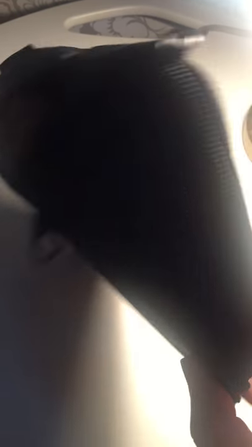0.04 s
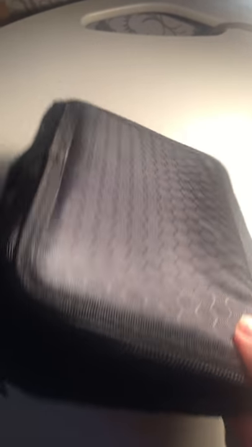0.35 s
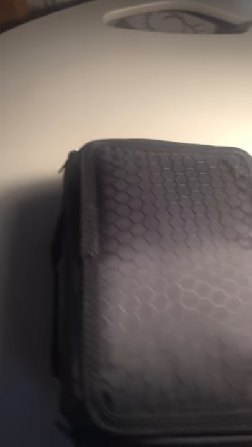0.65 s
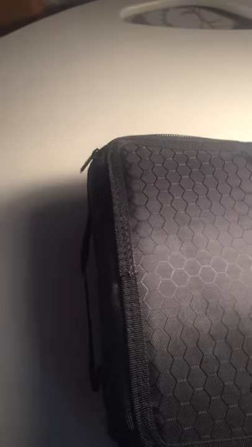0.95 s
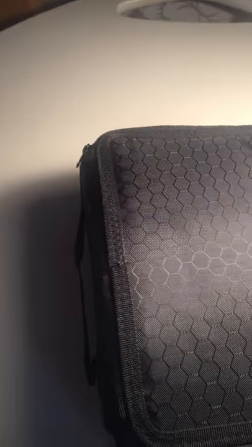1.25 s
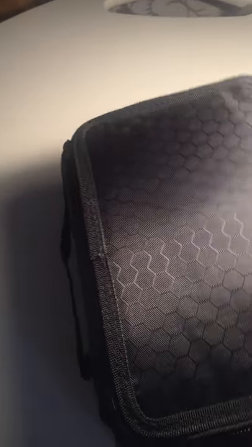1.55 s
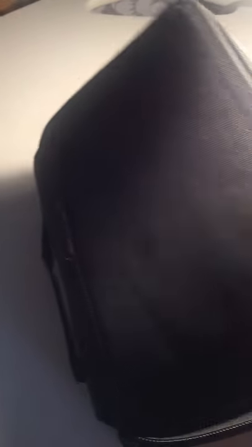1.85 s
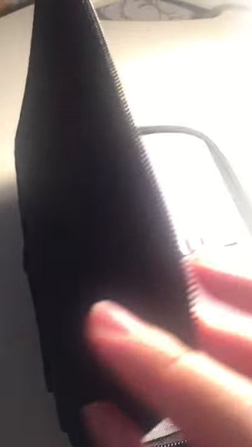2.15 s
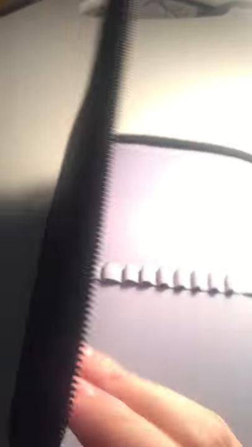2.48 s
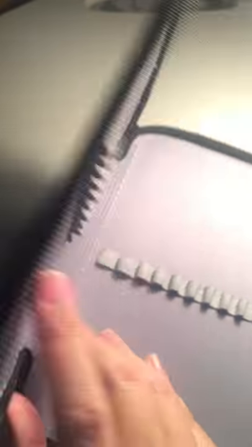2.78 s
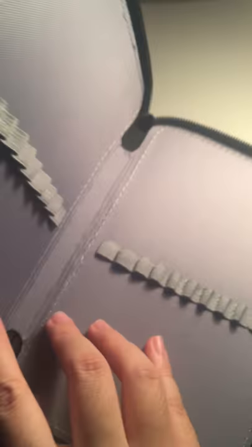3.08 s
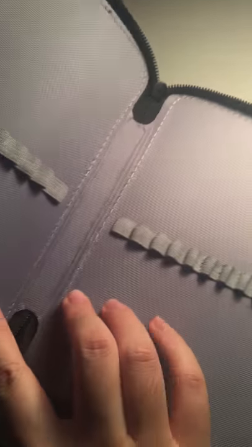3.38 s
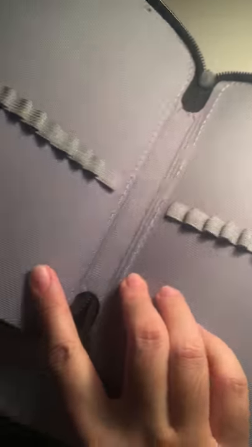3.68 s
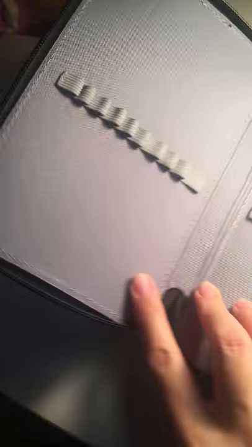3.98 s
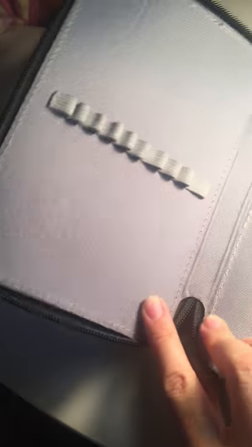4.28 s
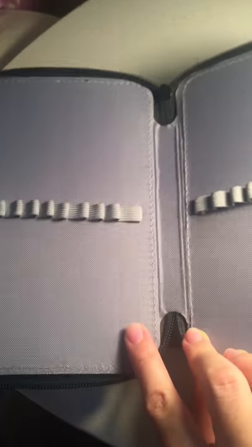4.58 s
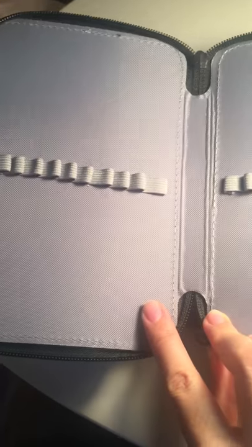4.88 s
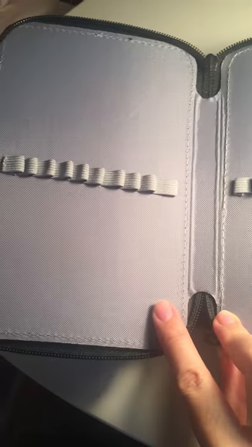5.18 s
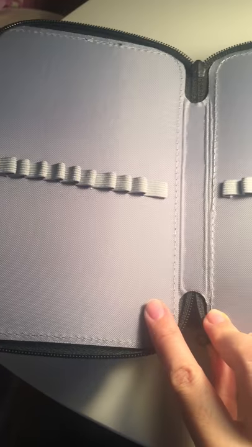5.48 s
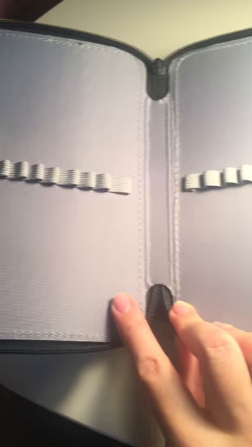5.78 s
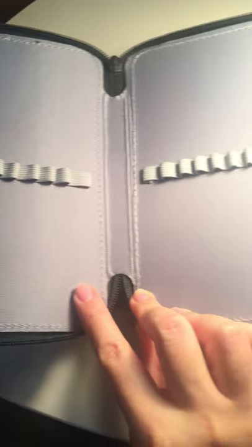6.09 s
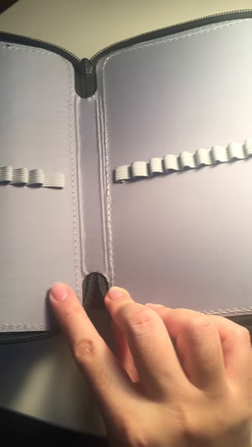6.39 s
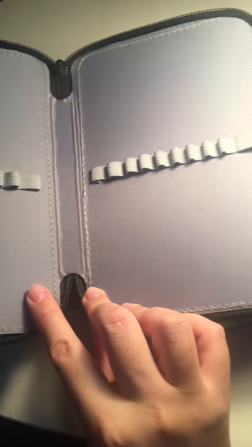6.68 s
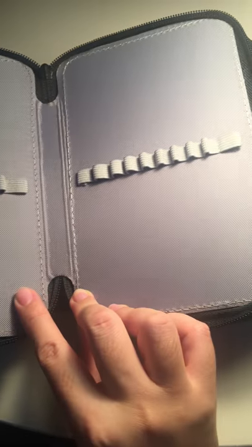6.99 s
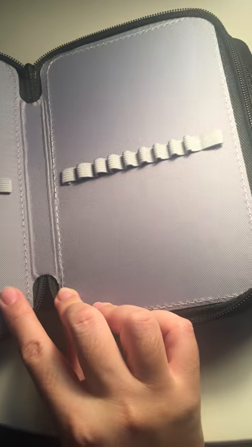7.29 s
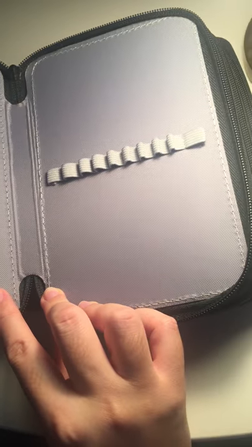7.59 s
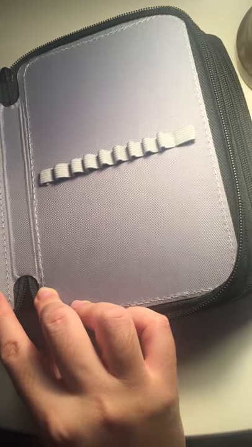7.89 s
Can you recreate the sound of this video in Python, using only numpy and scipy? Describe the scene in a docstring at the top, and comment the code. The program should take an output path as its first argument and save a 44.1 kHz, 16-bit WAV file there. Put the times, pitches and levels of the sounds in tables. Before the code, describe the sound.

A stiff fabric pencil case is set down and opened, with rustling scrapes, soft knocks and small zipper clicks in a quiet room.

```python
"""A stiff fabric pencil case is set down on a desk, opened and slid about by hand in a quiet room.
Its ribbed edge rasps over the desk, the padded shell drags and the cloth swishes: trains of tiny slips.
Corners knock, fingers tap and the spine creaks through a shell whose resonances change as it opens.
Zipper teeth chatter and the metal pulls jingle. Then the hand rests, leaving the room's low hum."""
import sys
import numpy as np
from scipy import signal
from scipy.fft import rfft, irfft, next_fast_len
from scipy.io import wavfile
from scipy.ndimage import map_coordinates

SR = 44100
rng = np.random.default_rng(int(sys.argv[2]) if len(sys.argv) > 2 else 0)


def wav_out(sig):
    """Save sig, one row per channel (or a flat mono array), as 16-bit PCM at SR to the path in sys.argv[1]."""
    wavfile.write(sys.argv[1], SR, np.round(np.clip(np.atleast_2d(sig).T, -1, 1) * 32767).astype(np.int16))


N = 355005
TIME = np.arange(N) / SR
FREQS = np.fft.rfftfreq(4096, 1 / SR)

# Shell resonances, folded and flat. Each row: centre in Hz, width in Hz, gain in dB (dead spot if < 0).
FOLDED_MODES = [(369, 19, 7.5), (476, 64, 8.5), (548, 27, -4.5), (603, 57, 7), (717, 105, 6.5),
                (800, 85, 0), (853, 20, 0), (1080, 45, 7), (1286, 66, 1), (1374, 58, 3), (1620, 220, -1),
                (1853, 75, 9.5), (2010, 78, 2), (2210, 87, -4), (2240, 250, 9), (2580, 390, 5),
                (2940, 90, 6.5), (3525, 41, 9), (4130, 130, 0), (5570, 130, 11.5)]
FLAT_MODES = [(403, 120, -4.5), (500, 30, 6.5), (601, 47, 8), (692, 63, 7), (753, 150, 7), (980, 71, -3.5),
              (1150, 160, 4.5), (1400, 100, -7), (1615, 96, 9.5), (1838, 59, 8), (1984, 50, 10.5),
              (2177, 110, -9), (2240, 160, 9), (2490, 110, -0.5), (2650, 110, 4.5), (2880, 100, 9),
              (2980, 180, 7), (4090, 150, 0.5), (4600, 1200, -3.5)]
# Opening of the case. Each row: time in seconds, flatness from 0 to 1.
OPENING = [(3.2, 0), (3.8, 0.85)]


def rubbing(rest_s=4.95, rest_db_per_s=60):
    """Ribs tick over the desk, threads brush and the padded shell drags under uneven hand pressure."""
    # Friction spectra. Each row: frequency in Hz, relative level in dB.
    rasp_spectrum = [(60, -36), (250, -49), (420, 0.5), (650, -8.5), (1100, 5), (2000, 3.5), (2800, -0.5),
                     (4000, -2), (5800, -13.5), (7300, -24.5), (17000, -47)]
    swish_spectrum = [(100, -31), (600, -20), (1200, 9), (2000, -2), (3200, 5), (6000, -2), (8000, -1),
                      (9300, 3.5), (10500, -3.5), (13000, 4), (17000, -0.5)]
    drag_spectrum = [(30, -43.5), (110, -3.5), (260, -6.5), (450, -2.5), (720, -5), (950, -6), (1600, -10),
                     (5000, -51.5)]
    # Resonances of the stiff lid. Each row: centre in Hz, width in Hz, gain in dB.
    lid_modes = [(467, 130, 28), (706, 190, 30), (1026, 76, 6), (1400, 84, 15), (3060, 160, 4),
                 (3250, 150, 7.5), (4100, 210, 3.5), (4400, 35, 2), (5920, 720, 6.5), (6600, 500, 5)]
    pressure = wander(75)
    ribs = slips(per_s=420, jitter=0.4, uneven_db=3, hiss=0.32)
    threads = slips(per_s=2200, jitter=0.6, uneven_db=3, hiss=0.3)
    stutter = slips(per_s=260, jitter=0.6, uneven_db=2.5, hiss=0.58)
    rasp = through_case(ribs, rasp_spectrum) * amp(-4 + 1.12 * pressure)
    cloth_db = curve(swish_spectrum) + resonances(lid_modes)
    swish = unit(colour(threads, cloth_db)) * amp(1.5 + 0.94 * pressure)
    drag = through_case(stutter, drag_spectrum) * amp(-2 + 1.2 * pressure)
    grip = amp(-73) * rasp + amp(-78) * swish + amp(-75.5) * drag  # faint rustle under the hand
    grip *= amp(-rest_db_per_s * np.maximum(TIME - rest_s, 0))
    return grip + mix(edge_scrapes(rasp, drag)) + mix(cloth_swishes(swish))


def edge_scrapes(rasp, drag, pivot_hz=2000):
    """Edge and shell slide together; each scrape has its own brighter or duller rasp."""
    # Each row: start and length in seconds, gain and swell in dB, tilt in dB/octave, drag offset in dB.
    scrapes = [(0, 0.014, -59, -13, 9.5, 3), (0.12, 0.072, -65.5, 3, -1, 6.5),
               (0.267, .028, -53.5, -7, 2.5, 3.5), (0.369, 0.016, -53, -2, 0, 4),
               (0.422, 0.1, -57, -10, 1, 0.5), (0.543, 0.083, -58.5, 9, -2.5, -9),
               (0.627, .1, -65, 4, 2.5, 5.5), (0.865, 0.055, -39, -6, 4.5, -3),
               (0.935, 0.074, -52, -5.5, -0.5, -1.5), (1.004, .045, -67.5, -8, 0, -13),
               (1.502, 0.015, -48, 4, .5, -19), (1.618, 0.031, -53.5, 15, 0, -26),
               (1.747, 0.097, -55, -10.5, -1.5, -24), (1.897, 0.039, -54, -9, -2.5, -14),
               (2.256, 0.13, -68.5, 18, -4, -11), (2.372, 0.086, -45, 11, 2, -42),
               (2.454, 0.046, -43, 1.5, 5.5, -12), (2.529, 0.1, -45, -5, 1.5, -17),
               (2.648, 0.069, -40.5, 5, 2, -19.5), (2.734, .055, -47.5, -2.5, 1, -7),
               (2.843, 0.089, -52, -0.5, 3.5, -13), (2.97, 0.063, -50, -6, -3.5, -4),
               (3.07, .055, -59, -11, 8.5, 0.5), (3.384, 0.026, -43.5, 2.5, 2.5, -11),
               (3.44, 0.11, -68, -2, -3, 1), (3.877, 0.188, -47.5, 0.5, 3, -12.5),
               (4.088, 0.13, -43.5, 4.5, 0.5, -6.5), (4.242, 0.0083, -48, 9, 3, 2.5),
               (4.315, 0.028, -54.5, 5, -2, 6), (4.453, 0.045, -46.5, -2.5, -1, 0.5),
               (4.546, 0.034, -44, 5, 0, -18), (4.596, 0.083, -52.5, 3.5, -1.5, -30),
               (4.82, 0.018, -64, -7, -6.5, -12), (4.926, 0.032, -70.5, -8, -5, -12)]
    octaves = np.clip(np.log2((FREQS + 1) / pivot_hz), -2, 2)
    for start_s, length_s, db, swell_db, tilt_db, drag_db in scrapes:
        at_s, sound = stroke(rasp, start_s, length_s, db, swell_db)
        yield at_s, colour(sound, tilt_db * octaves)
        yield stroke(drag, start_s, length_s, db + drag_db, swell_db)


def cloth_swishes(swish):
    """Cloth brushes over cloth."""
    # Each row: start in seconds, length in seconds, gain in dB, swell in dB.
    swishes = [(0.118, 0.034, -64, -7), (0.261, 0.0039, -62, -1), (.37, 0.0079, -55, 7),
               (0.902, 0.093, -61, 12), (2.493, 0.13, -58.5, -4), (2.645, 0.15, -53.5, -6.5),
               (2.883, 0.026, -53, -4.5), (2.983, .035, -50.5, 2), (3.059, 0.07, -51.5, -2),
               (3.142, 0.068, -65.5, -8), (3.266, 0.028, -72, -2), (3.396, 0.089, -71, 4),
               (4.086, 0.094, -61, -3), (4.312, 0.028, -59.5, 11), (4.433, 0.063, -58.5, -6),
               (4.56, 0.13, -68, -7)]
    return [stroke(swish, *row) for row in swishes]


def stroke(friction, start_s, length_s, db, swell_db, attack_db_per_s=1004, release_db_per_s=709):
    """Friction rises quickly, swells or sags, then dies. Returns (start in seconds, sound)."""
    part = slice(max(0, round((start_s - 0.06) * SR)), round((start_s + length_s + 0.3) * SR))
    t = TIME[part] - start_s
    before_s, after_s = np.maximum(-t, 0), np.maximum(t - length_s, 0)
    hold_db = db + swell_db * (np.clip(t / length_s, 0, 1) - 0.5)
    creep_db = -28.5 - 92 * after_s  # the fabric settles
    release_db = np.maximum(-release_db_per_s * after_s, creep_db)
    return TIME[part.start], friction[part] * amp(hold_db - attack_db_per_s * before_s + release_db)


def slips(per_s, jitter, uneven_db, hiss):
    """Tiny uneven catches at a wavering speed, over noise."""
    passed = np.cumsum(per_s * np.exp(jitter * wander(150))) / SR
    caught = np.diff(np.floor(passed), prepend=0)
    sizes = amp(uneven_db * np.clip(rng.standard_normal(N), -2, 2))
    return unit(caught * sizes) + hiss * rng.standard_normal(N)


def thuds(decay_cycles=1.6):
    """The padded case thuds for a few swings, so low thuds last longer."""
    # Each row: time in seconds, strength in dB, centre in Hz.
    hits = [(0, -39, 74), (.094, -41, 65), (.276, -49, 247), (0.63, -47, 245), (0.656, -54, 65),
            (0.9243, -36, 500), (.927, -45, 245), (.928, -39, 93), (1.953, -56.5, 78), (2.979, -49.5, 280),
            (4.159, -50.5, 260), (4.164, -47.5, 160), (5.236, -66, 205)]
    return [blow(s, db, hz, octaves=0.66, decay_s=decay_cycles / hz, chatter=0.7) for s, db, hz in hits]


def edge_raps():
    """The stiff edge raps the desk on landing."""
    # Each row: time in seconds, strength in dB.
    hits = [(0.85, -32.5), (0.8667, -36), (0.8761, -31.5), (.8825, -55)]
    return [blow(s, db, hz=2300, octaves=0.66, decay_s=0.0083, chatter=0.71) for s, db in hits]


def zipper_teeth():
    """The teeth chatter in short bursts."""
    # Each row: time in seconds, strength in dB, centre in Hz, spread in octaves.
    bursts = [(.336, -55, 5660, 1.3), (0.907, -43.5, 4600, .66), (0.9094, -31, 3700, 0.78),
              (1.13, -62.5, 3980, 0.97), (1.477, -57, 5800, 2.3), (1.942, -54.5, 4900, 1.6),
              (2.136, -69.5, 7000, 1.5), (2.455, -42, 2800, 0.67), (3.413, -56.5, 5940, 1.1),
              (4.256, -55.5, 6000, 1.5)]
    return [blow(*row, decay_s=0.0037, chatter=5.6, rise_s=0.0013) for row in bursts]


def finger_taps():
    """Fingers tap the shell."""
    # Each row: time in seconds, strength in dB, centre in Hz, decay in seconds.
    taps = [(.665, -50, 724, 0.0069), (1.151, -60, 650, 0.005), (1.948, -52, 1150, 0.0039),
            (3.258, -58.5, 875, 0.022), (3.5459, -44.5, 1150, .0006), (5.069, -69.5, 1150, 0.004),
            (5.236, -63, 755, .0025), (5.835, -67.5, 970, .003)]
    return [blow(s, db, hz, octaves=0.59, decay_s=decay_s, chatter=1) for s, db, hz, decay_s in taps]


def spine_creaks(rise_s=0.00099, decay_s=0.0031):
    """The bending spine slips, each time with a bright tick."""
    # Each row: time in seconds, strength in dB, centre in Hz, spread in octaves, tick offset in dB.
    creaks = [(2.977, -47, 880, 0.74, -22), (4.3038, -47.5, 1280, 0.84, -15), (4.343, -50, 895, 1.6, -4.5),
              (4.3675, -42.5, 945, 0.97, -9), (4.3897, -36.5, 740, 0.65, -14),
              (4.3922, -40, 1400, 1.66, -8.5), (4.4233, -39.5, 850, 1.2, -13),
              (4.4357, -38, 770, 0.71, -14), (4.457, -44.5, 740, 0.52, -14), (4.489, -43.5, 865, 0.27, -28)]
    for s, db, hz, octaves, tick_db in creaks:
        yield blow(s, db, hz, octaves, decay_s, chatter=2.5, rise_s=rise_s)
        yield blow(s, db + tick_db, hz=6500, octaves=0.29, decay_s=decay_s, chatter=4.3, rise_s=rise_s)


def panel_flexes():
    """A panel flexes and rings briefly at one pitch."""
    # Each row: time in seconds, strength in dB, pitch in Hz, decay in seconds.
    flexes = [(.96, -56, 96, .035), (1.21, -61.5, 3400, .01), (3.381, -48.5, 2400, .014),
              (2.993, -44, 685, 0.011), (3.1, -50.5, 460, 0.0041), (4.162, -47.5, 371, 0.012),
              (4.179, -48, 117.5, 0.028), (4.55, -49, 1620, .06), (4.81, -63, 1630, .07)]
    return [blow(s, db, hz, octaves=0.12, decay_s=decay_s, chatter=2) for s, db, hz, decay_s in flexes]


def blow(s, db, hz, octaves, decay_s, chatter, rise_s=0.00031):
    """One push on the shell amid a dying rattle of small contacts. Returns (start in seconds, sound)."""
    lead_s, rms_span_s = 0.004, 0.01
    t = np.arange(SR // 4) / SR - lead_s
    envelope = np.exp(-t / decay_s) * (1 + np.tanh(t / rise_s))
    rattle = rng.standard_normal(len(t)) * envelope
    force = signal.unit_impulse(len(t), round(lead_s * SR)) + chatter * rattle / np.linalg.norm(rattle)
    offset = np.log2((FREQS + 1) / hz) / octaves
    band_db = -50 * np.log10(1 + (offset / 2) ** 2)
    padding_db = -10 * np.maximum(offset - 2.4, 0)
    shell_db = resonances(FLAT_MODES if s > OPENING[-1][0] else FOLDED_MODES)
    sound = colour(force, np.maximum(band_db + padding_db, -90) + shell_db)
    return s - lead_s, amp(db) * sound / np.linalg.norm(sound) * np.sqrt(rms_span_s * SR)


def zipper_pulls(rise_s=0.0011, click_decay_s=0.0038, bounces_per_s=450, buzz_decay_s=0.0075):
    """A metal tab clicks, buzzes against its slider and rings in a few high modes."""
    # Each row: time in seconds, strength in dB, main mode in Hz, bending and click trims in dB.
    hits = [(0.333, -59, 13860, -12, -5), (.386, -48.5, 13500, -32, 0), (0.546, -63.5, 13500, -5, 12),
            (0.603, -55, 13900, 2, 6), (0.617, -58, 13810, -9, 11.5), (.68, -56, 13720, 2.5, 14.5),
            (0.698, -49.5, 13680, -3, -19), (0.717, -46, 13700, -6.5, 1.5), (.733, -57, 13700, -16, -1),
            (0.85, -48, 13700, -18, 2), (.873, -46.5, 13540, -13, 8), (.903, -50, 14300, -2, 3),
            (0.969, -55, 13250, -8, -12), (.993, -46, 13230, -11, 3), (1.151, -41, 13700, -20, -10),
            (1.275, -69.5, 13760, -5, 8), (1.814, -63, 13640, -11, -5), (2.474, -63.5, 13070, 15, -10),
            (2.577, -60, 13800, -8, -10), (4.137, -45, 13370, -18, -18), (4.169, -48, 13330, -11, -13),
            (4.196, -47.5, 13160, -15, -29), (4.317, -58.5, 13100, 5, 2), (4.575, -55.5, 13540, -6, -4),
            (4.666, -54, 13700, -19, -13)]
    # Tab modes, main first, bending second. Each row: frequency in Hz, gain in dB, T60 in seconds.
    tab_modes = [(13540, 5, 0.046), (5690, 10, 0.032), (8650, -20, 0.13), (13820, -30, 0.06),
                 (16200, -27, .025), (13700, -26, 0.041)]
    # Each row: frequency in Hz, gain in dB.
    click_spectrum = [(300, -10), (3000, -8.5), (6000, -5.5), (8000, -9.5), (10000, -5.5), (16000, -6)]
    t = np.arange(SR // 5) / SR
    onset = np.tanh(t / rise_s)
    mode_hz, mode_db, t60_s = np.transpose(tab_modes)[:, :, None]
    is_bending = (np.arange(len(tab_modes)) == 1)[:, None]
    for s, db, hz, bending_db, click_db in hits:
        detune = hz / mode_hz[0] * (1 + 0.0071 * rng.standard_normal(mode_hz.shape))
        envelopes = amp(mode_db + bending_db * is_bending - 60 * t / t60_s)
        ring = (envelopes * np.sin(2 * np.pi * mode_hz * detune * t)).sum(0)
        bounces = 0.9 * sparse_noise(len(t), bounces_per_s) * np.exp(-t / buzz_decay_s)
        jingle = ring + signal.fftconvolve(ring, bounces)[:len(t)]
        jingle *= np.linalg.norm(ring) / np.linalg.norm(jingle)  # bounces share one blow's energy
        burst = rng.standard_normal(len(t)) * np.exp(-t / click_decay_s) * onset
        click = colour(burst, curve(click_spectrum))
        yield s, amp(db + 3) * jingle * onset + amp(db + click_db + 8) * click


def through_case(x, spectrum):
    """The shell's resonances crossfade from folded toward flat as it opens."""
    flatness = np.interp(TIME, *np.transpose(OPENING))
    folded = unit(colour(x, curve(spectrum) + resonances(FOLDED_MODES)))
    flat = unit(colour(x, curve(spectrum) + resonances(FLAT_MODES)))
    return bending_waves((1 - flatness) * folded + flatness * flat)


def bending_waves(x, lag_at_1khz_s=0.000691):
    """Treble outruns bass in the shell, so a click becomes a tiny chirp."""
    size = next_fast_len(len(x) + 512, True)
    khz = np.fft.rfftfreq(size, 1 / SR) / 1000
    turns = 2000 * lag_at_1khz_s * np.sqrt(khz)
    return irfft(rfft(x, size) * np.exp(-2j * np.pi * turns), size)[:len(x)]


def sliding_echoes(x, delays_s=(0.001168, 0.0034), travel=0.1595, gain=0.49):
    """The rubbing spot moves, so its echoes off desk and lid slide and the colour shifts."""
    out = x.copy()
    for delay_s in delays_s:
        late_s = delay_s * np.exp(travel * wander(2.095))
        out += gain * map_coordinates(x, [np.arange(N) - late_s * SR], order=3)
    return out / np.sqrt(1 + 2 * gain ** 2)


def room(x, wet_db=-13, first_s=0.004):
    """Sparse reflections off desk and walls, each band dying at its own rate."""
    # Each row: frequency in Hz, T60 in seconds.
    decay_times = [(100, 0.42), (600, 0.15), (3000, 0.092), (8000, 0.11), (16000, 0.1)]
    reflections = sparse_noise(SR // 2, per_s=3000) * (TIME[:SR // 2] > first_s)
    hz, t, bands = signal.stft(reflections, SR, nperseg=256)
    tail = signal.istft(bands * amp(-60 * t / curve(decay_times, hz)[:, None]), SR)[1]
    return x + amp(wet_db) * signal.oaconvolve(x, tail / np.linalg.norm(tail))[:N]


def room_tone(noise_db=-69.5):
    """Steady hiss and rumble with a wavering low hum."""
    # Each row: frequency in Hz, relative level in dB.
    noise_spectrum = [(15, -71), (25, -6.5), (106, -3), (147, -8), (234, -6.5), (269, -6), (291, -13.5),
                      (353, -10), (427, -14.5), (778, -16), (917, -16), (1460, -17), (1580, -18),
                      (3220, -21), (17000, -31.5)]
    # Each row: frequency in Hz, width in Hz, level in dB.
    hum_lines = [(266.7, 11.4, -79.5), (118, 6.7, -81)]
    out = amp(noise_db) * unit(colour(rng.standard_normal(N), curve(noise_spectrum)))
    for hz, width_hz, db in hum_lines:
        waver = wander(width_hz) + 1j * wander(width_hz)
        out += amp(db) * unit((waver * np.exp(2j * np.pi * hz * TIME)).real)
    return out


def amp(db):
    """Decibels to gain."""
    return 10 ** (np.asarray(db) / 20)


def unit(x):
    """Scales to rms 1."""
    return x / np.sqrt(np.mean(x ** 2) + 1e-30)


def curve(points, hz=FREQS):
    """Interpolates over log frequency."""
    point_hz, values = np.transpose(points)
    return np.interp(np.log(hz + 1), np.log(point_hz + 1), values)


def resonances(modes):
    """Summed resonance humps in dB on FREQS."""
    return sum(db / (1 + (2 * (FREQS - hz) / width_hz) ** 2) for hz, width_hz, db in modes)


def colour(x, db):
    """Minimum-phase filter with gain db on FREQS."""
    log_gain = np.log(amp(np.concatenate([db, db[-2:0:-1]])))
    taps = irfft(np.exp(np.conj(signal.hilbert(log_gain)))[:len(db)])
    return signal.oaconvolve(x, taps)[:len(x)]


def wander(hz):
    """Smooth noise of rms 1, rolling off at hz."""
    size = next_fast_len(N, True)
    lowpass = np.exp(-(np.fft.rfftfreq(size, 1 / SR) / hz) ** 2)
    return unit(irfft(rfft(rng.standard_normal(N), size) * lowpass)[:N])


def sparse_noise(count, per_s):
    """Impulses of random time and size."""
    return rng.standard_normal(count) * (rng.random(count) < per_s / SR)


def mix(events):
    """Sums (start in seconds, sound) pairs into one track."""
    out = np.zeros(N)
    for s, sound in events:
        part = out[max(0, round(s * SR)):][:len(sound)]
        part += sound[:len(part)]
    return out


def scene():
    """The handled case in its room, mono."""
    friction = sliding_echoes(rubbing())
    knocks = mix([*thuds(), *edge_raps(), *zipper_teeth(),
                  *finger_taps(), *spine_creaks(), *panel_flexes()])
    case = friction + amp(2) * bending_waves(knocks) + mix(zipper_pulls())
    return (room(case) + room_tone())[None]


def record(dry, low_hz=42, high_hz=17400):
    """Low cut and band limit."""
    thin = signal.sosfilt(signal.butter(4, low_hz, "high", fs=SR, output="sos"), dry)
    lowpass = signal.firwin(511, high_hz, window=("kaiser", 8), fs=SR)
    return signal.oaconvolve(thin, lowpass[None], "same")


dry = scene()
out = record(dry)
wav_out(out)
```